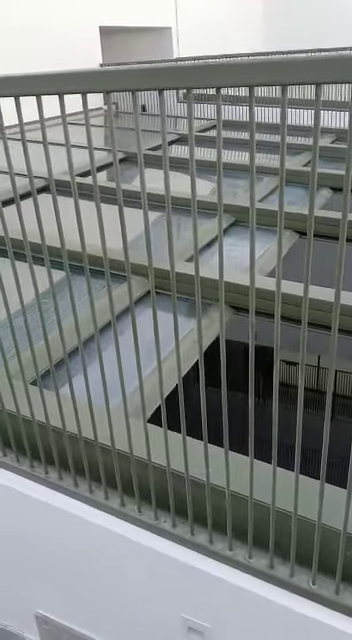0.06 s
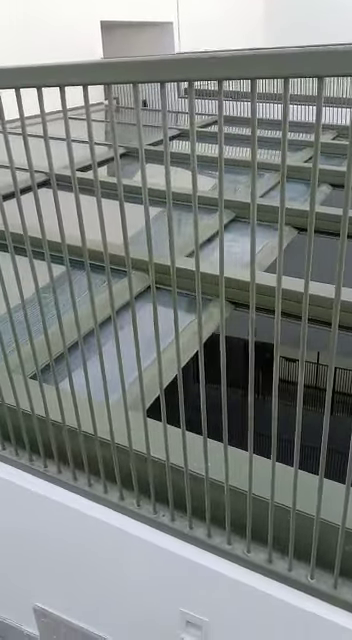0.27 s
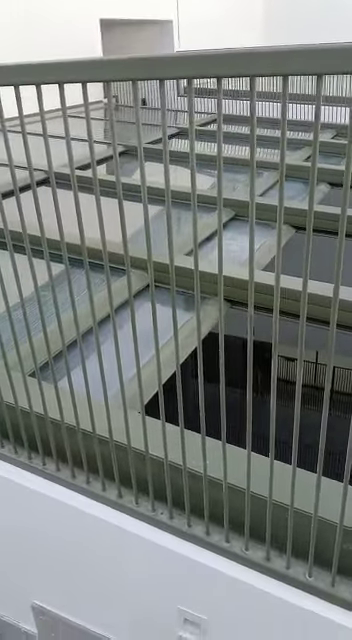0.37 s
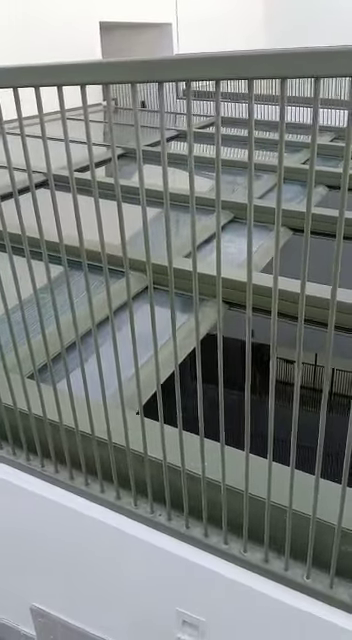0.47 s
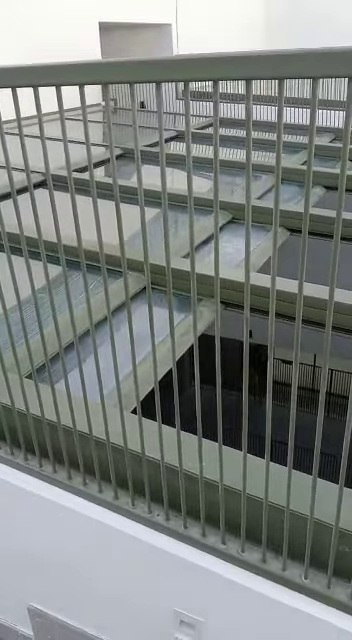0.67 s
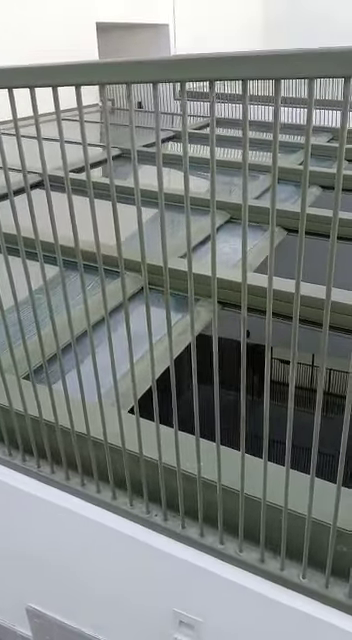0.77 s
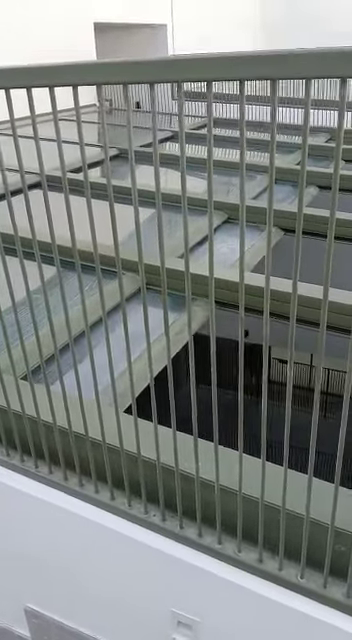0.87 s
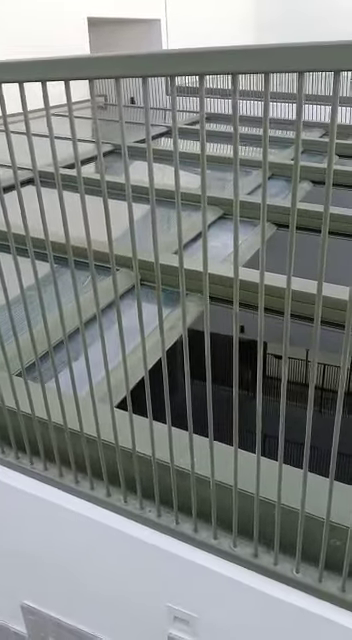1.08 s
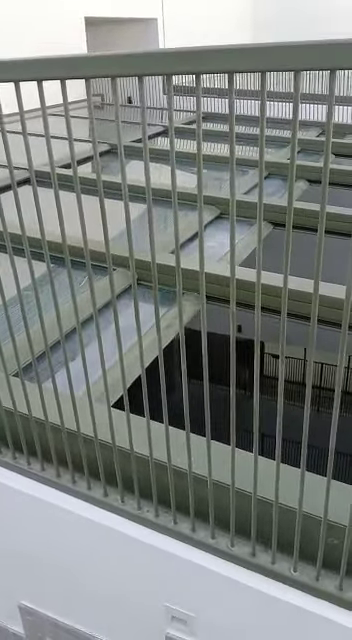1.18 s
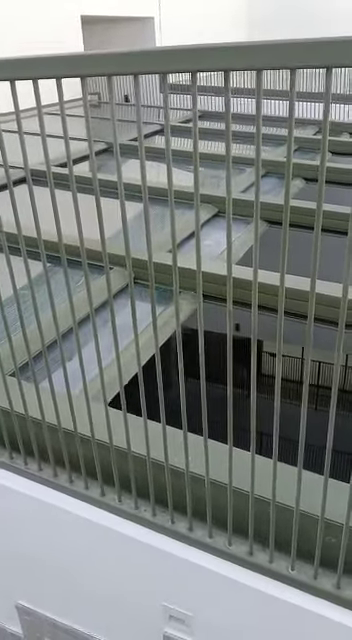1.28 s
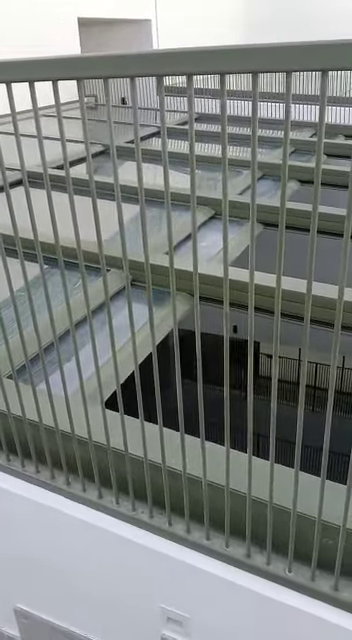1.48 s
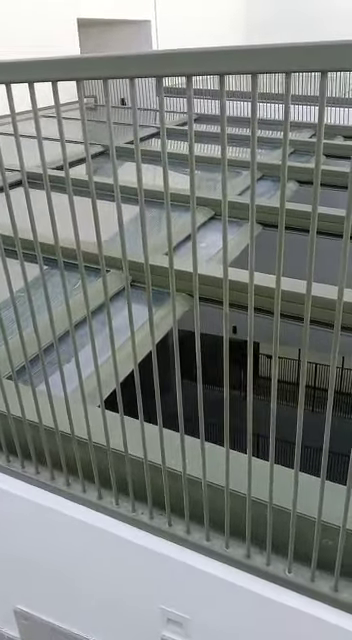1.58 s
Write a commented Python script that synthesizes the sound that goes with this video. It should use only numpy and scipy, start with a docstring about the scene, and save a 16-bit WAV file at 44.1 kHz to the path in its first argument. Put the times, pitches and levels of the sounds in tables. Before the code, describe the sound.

A heavy steel door slams far off and rings through a large bare hall.

```python
"""In a tall bare hall, a heavy steel door slides, catches and slams far off; the hall rings about two seconds.
Each contact of the door sends out a short punch, echoes off the walls and sets the steel ringing.
Nearer by are a few short squeaks, perhaps of shoes that stick and slip, and dull hollow bumps.
Under it all lie a soft hiss of air and the hall's low rumble."""
import sys
import numpy as np
from scipy import signal
from scipy.fft import rfft, irfft, next_fast_len
from scipy.io import wavfile

SR = 44100
rng = np.random.default_rng(int(sys.argv[2]) if len(sys.argv) > 2 else 0)


def inscribe(sig):
    """Save sig as 16-bit PCM at rate SR to the path in sys.argv[1].

    A 1-D sig is mono; a 2-D sig holds one channel per row.
    Samples are clipped to [-1, 1] before scaling.
    """
    pcm = np.round(np.clip(np.atleast_2d(sig).T, -1, 1) * 32767)
    wavfile.write(sys.argv[1], SR, pcm.astype(np.int16))


N = 72765

# Each time the door strikes something. A fade time, here and below, is the time to drop by 60 dB.
# start_s, level_db, tilt_db_per_octave, punch_over_echo_db, punch_fade_s, cutoff_hz, echo_rise_s
DOOR_CONTACTS = [(0.05, -44, 3.5, 0, 0.025, 4000, .0015), (0.078, -45.5, 4, -3, 0.023, 5500, 0.0035),
                 (.112, -55, -8.5, 4, 0.037, 5000, .003), (0.197, -33, -3, 3, 0.034, 3000, 0.0016),
                 (0.207, -33.5, 1.5, -18, 0.029, 9000, 0.0047),
                 (0.2293, -24.5, 0.48, 7, .045, 18000, 0.0036), (0.302, -34.5, -1.2, 2, 0.072, 9000, .005)]


def amp(db):
    """Turn decibels into a factor to multiply by."""
    return 10 ** (np.asarray(db) / 20)


def unit(x):
    """Scale a sound to an average strength (rms) of 1."""
    return x / np.sqrt(np.mean(x ** 2) + 1e-20)


def along(points, hz):
    """Read a curve of (pitch_hz, value) points at hz, with octaves evenly spaced."""
    pitches, values = np.transpose(points)
    return np.interp(np.log(hz + 1), np.log(pitches + 1), values)


def filtered(x, response):
    """Turn each frequency of x up or down by the factor response(hz)."""
    size = next_fast_len(N + SR // 2)
    return irfft(rfft(x, size) * response(np.fft.rfftfreq(size, 1 / SR)), size)[:N]


def noise(response):
    """Noise of strength 1, with its tone shaped by response(hz)."""
    return unit(filtered(rng.standard_normal(N + SR), response))


def band(hz, width_hz):
    """A narrow band of noise, heard as an unsteady tone."""
    return noise(lambda f: 1 / (1 + (2 * (f - hz) / width_hz) ** 2))


def since(start_s):
    """Seconds since start_s at every sample, zero before it."""
    return np.maximum(np.arange(N) / SR - start_s, 0)


def tilt(hz, db_per_octave):
    """A factor that brightens or dulls a sound: it pivots at 1800 Hz and is flat below 300 Hz."""
    return amp(db_per_octave * np.log2(np.maximum(hz, 300) / 1800))


def hall_background():
    """A soft hiss of air, a faint drone from the hall's low resonance and a slowly swelling rumble."""
    # Tone of the air and of the rumble: pitch_hz, relative_db
    air_tone = [(25, -30), (45, -32), (60, -14.5), (250, -1), (450, -4), (800, -6.5), (1050, -11.5),
                (1280, -9), (1900, -16), (2500, -11.5), (3300, -18), (4000, -21), (5600, -19.5),
                (6300, -34.5), (7200, -28), (8100, -47), (9600, -38.5), (13000, -48), (15500, -35)]
    rumble_tone = [(30, -38), (60, -26), (76, 3.5), (100, 4), (150, 7), (210, 7), (350, -15), (800, -59)]
    # How loud each is over time: time_s, level_db
    air_levels = [(0, -50), (.3, -46), (.9, -52), (1.18, -51), (1.398, -52.5), (1.55, -50), (1.65, -48.5)]
    rumble_levels = [(0, -56), (.35, -61.5), (.65, -53.5), (.8, -49), (1.1, -48.5), (1.3, -57.5),
                     (1.45, -45.5), (1.65, -55)]
    swell = lambda levels: amp(np.interp(since(0), *np.transpose(levels)))
    air = swell(air_levels) * noise(lambda f: amp(along(air_tone, f)))
    drone = amp(-63) * band(hz=74, width_hz=12)
    rumble = swell(rumble_levels) * noise(lambda f: amp(along(rumble_tone, f)))
    return air + drone + rumble


def bumps():
    """Soft hollow knocks: each is one fading note, blurred by the hall, with a puff of scuffing."""
    # The knocks: start_s, pitch_hz, level_db, rise_s, fade_s, scuff_db
    knocks = [(.09, 303.8, -44.5, 0.0049, 0.44, -54.5), (0.193, 347, -35, 0.0096, 0.17, -40.5),
              (.207, 436, -34.5, 0.0045, 0.088, -57), (.38, 288, -38.5, 0.0053, 0.11, -62),
              (0.521, 301.9, -41.5, 0.006, 0.3, -67), (0.624, 213, -45, 0.0085, 0.07, -57),
              (0.483, 1271, -37, 0.0082, 0.13, -66), (.86, 777, -46, 0.008, 0.068, -70),
              (.95, 234.4, -33.5, 0.0055, 0.11, -46), (0.971, 284, -35, 0.0081, 0.31, -49),
              (1.044, 211, -39.5, 0.0097, 0.11, -51.5), (1.112, 202.3, -36.5, 0.011, 0.15, -44.5),
              (1.263, 300.7, -43.5, 0.0091, 0.31, -53.5), (1.406, 132, -52.5, 0.015, 0.17, -75),
              (1.41, 320, -48, 0.0038, .15, -76), (1.455, 198, -43.5, 0.0085, 0.08, -63),
              (1.557, 281, -37, 0.0085, 0.061, -56), (1.623, 235, -50.5, 0.012, 0.28, -53.5)]
    # Tone of the scuffing: pitch_hz, relative_db
    scuff_tone = [(60, -22), (200, 7), (330, -15), (450, -6), (600, 2), (1000, -22), (1250, 4), (1800, -28),
                  (2700, -7), (5500, -15), (8000, -36.5), (10000, -33), (13000, -54), (15000, -35)]
    scuff_fade_s = 0.45
    out = np.zeros(N)
    for start_s, pitch_hz, level_db, rise_s, fade_s, scuff_db in knocks:
        t, after_peak = since(start_s), since(start_s + rise_s)
        note = np.sqrt(2) * np.sin(2 * np.pi * pitch_hz * t)
        blur = 0.3 * band(pitch_hz, width_hz=100)
        body = (note + blur) * amp(level_db - 60 * after_peak / fade_s)
        scuff = noise(lambda f: amp(along(scuff_tone, f)))
        scuff *= amp(scuff_db - 60 * after_peak / scuff_fade_s)
        out += (body + scuff) * np.minimum(t / rise_s, 1)
    return out


def squeaks():
    """Surfaces that stick and slip give brief wavering tones, each with a little echo."""
    # The squeaks: start_s, length_s, pitch_hz, glide_hz, level_db
    slips = [(0, 0.058, 3300, -27, -52.5), (.01, 0.0084, 4270, -10, -52.5),
             (0.074, 0.012, 6794, -120, -39.5), (.087, .008, 6780, 0, -68),
             (0.192, 0.014, 6500, 130, -37.5), (0.971, 0.0086, 3280, 152, -43),
             (1.19, 0.018, 3270, -6, -50), (1.25, 0.012, 7430, -77, -57), (1.501, 0.01, 3190, -40.5, -50),
             (1.518, 0.0095, 3200, -29, -48.5)]
    waver_hz, echo_db, echo_fade_s = 62, -7, 0.16
    out = np.zeros(N)
    for start_s, length_s, pitch_hz, glide_hz, level_db in slips:
        progress = np.minimum(since(start_s) / length_s, 1)
        waver = waver_hz * noise(lambda f: 1 / (1 + (f / 400) ** 2))
        pitch = pitch_hz + glide_hz * (progress - 0.5) + waver
        swell = np.sqrt(2 * np.abs(np.sin(np.pi * progress)))
        tone = swell * np.sin(2 * np.pi * np.cumsum(pitch) / SR)
        tail = rng.standard_normal(N) * amp(-60 * since(0) / echo_fade_s)
        echo = signal.fftconvolve(tone, tail / np.linalg.norm(tail))[:N]
        out += amp(level_db) * (tone + amp(echo_db) * echo)
    return out


def hall_echo(x, start_s, rise_s):
    """Shape x into an echo: from start_s each frequency builds up, then dies at the hall's own speed."""
    # How long the hall rings: pitch_hz, fade_s
    fade_times = [(100, 5.2), (400, 1.13), (900, 2.36), (2300, 2.1), (4000, 1.75), (6000, 1.39),
                  (8000, 0.89), (11000, 0.57), (15000, 0.48)]
    hz, t, spectrum = signal.stft(x, SR, nperseg=256)
    hz, age = hz[:, None], np.maximum(t - start_s, 0)
    treble_lag = np.maximum(hz / 3000, 1) ** 0.24  # high notes build up more slowly
    rise = 1 - np.exp(-age / (rise_s * treble_lag))
    fade = amp(-60 * age / along(fade_times, hz))
    return signal.istft(spectrum * rise * fade, SR, nperseg=256)[1][:N]


def door_clatter():
    """Each contact gives a short punch, then single bounces off the walls within a smooth echo."""
    # Tone of the punch, which arrives first, and of the echoing door: pitch_hz, relative_db
    punch_tone = [(100, -40), (330, -22), (700, -8), (1000, 1), (1700, 4.5), (2500, -4), (3400, -8),
                  (6000, -14), (8000, -30), (15000, -47)]
    door_tone = [(60, -42), (200, -46), (300, -12), (520, -10.5), (750, -9), (1100, -10), (1400, -7),
                 (2000, -5.5), (2700, -1.5), (3300, -10), (5200, -12.5), (6100, -19.5), (7300, -20),
                 (8100, -36.5), (10000, -25.5), (13500, -33.5), (15500, -24)]
    punch_rise_s, ripple_step_hz = 0.00081, 23.95
    bounces_per_s, bounce_db, bounce_fade_s = 110, -11, 0.9
    # The door's many small resonances put random ripples in its tone.
    ripples_db = 1.5 * rng.standard_normal(SR // 8)
    ripple = lambda f: np.interp(f / ripple_step_hz, np.arange(len(ripples_db)), ripples_db)
    out = np.zeros(N)
    for start_s, level_db, slope, punch_db, punch_fade_s, cutoff_hz, echo_rise_s in DOOR_CONTACTS:
        t = since(start_s)
        force = lambda f: tilt(f, slope) / np.sqrt(1 + (f / cutoff_hz) ** 4)
        echo_tone = lambda f: amp(along(door_tone, f) + ripple(f)) * force(f)
        punch = noise(lambda f: amp(along(punch_tone, f)) * force(f))
        punch *= amp(punch_db - 60 * t / punch_fade_s) * (1 - np.exp(-t / punch_rise_s))
        clicks = rng.uniform(-0.85, 1, N) * (rng.random(N) < bounces_per_s / SR)
        bounces = unit(filtered(clicks, echo_tone)) * amp(bounce_db - 60 * t / bounce_fade_s)
        echo = hall_echo(noise(echo_tone) + bounces, start_s, echo_rise_s)
        out += amp(level_db) * (punch + echo)
    return out


def door_ring():
    """The steel rings at its own pitches; every contact adds energy that then dies away."""
    # The door's ringing notes: pitch_hz, width_hz, relative_db, fade_s
    steel_notes = [(310, 26, -24.5, 2.6), (331.5, 12, -22.5, 1.1), (590, 47, -21, 2.25),
                   (1196, 11, -27.5, 3.2), (1263, 68, -14.5, 2.3), (1333, 12, -18.5, 2.1),
                   (1808, 4, -19, 0.57), (1892, 22, -23, 1), (2323, 105, -11, 2.82), (2564, 41, -22, 4.6),
                   (2590, 14, -17, 0.63), (2700, 32, -25, 2.6), (2970, 320, -12.5, 2.25),
                   (3975, 11, -16.5, 1.15)]
    rise_s = 0.0063
    out = np.zeros(N)
    for pitch_hz, width_hz, relative_db, fade_s in steel_notes:
        energy = np.zeros(N)
        for start_s, level_db, slope, *_ in DOOR_CONTACTS:
            t = since(start_s)
            strength = amp(level_db + relative_db - 60 * t / fade_s) * tilt(pitch_hz, slope)
            energy += (strength * (1 - np.exp(-t / rise_s))) ** 2
        out += band(pitch_hz, width_hz) * np.sqrt(energy)
    return out


def scene():
    """Add all the sounds in one channel; the door dies away faster at the very end."""
    end_fade = amp(-70 * since(1.33))  # 70 dB per second
    door = (door_clatter() + door_ring()) * end_fade
    return (door + squeaks() + bumps() + hall_background())[None]


def record(dry):
    """Cut away the very highest treble."""
    return np.array([filtered(x, lambda hz: hz < 15600) for x in dry])


dry = scene()
out = record(dry)
inscribe(out)
```